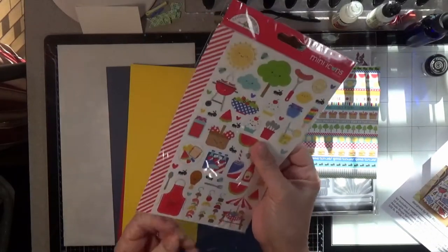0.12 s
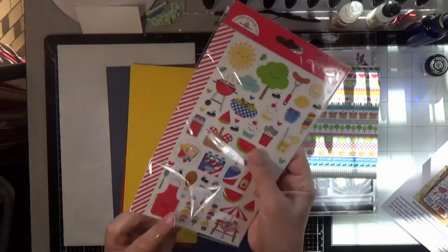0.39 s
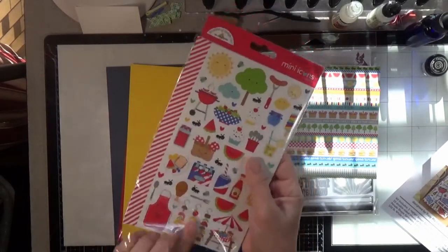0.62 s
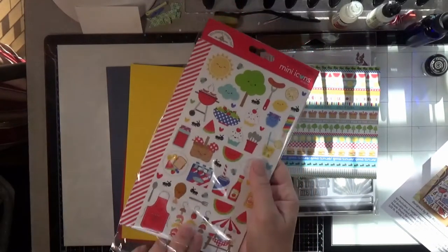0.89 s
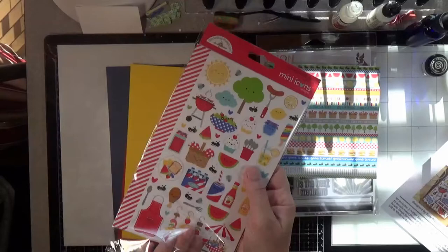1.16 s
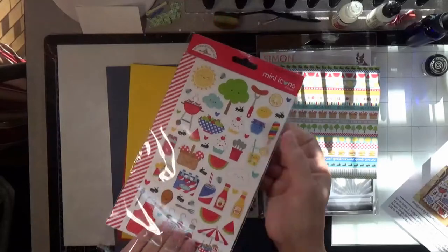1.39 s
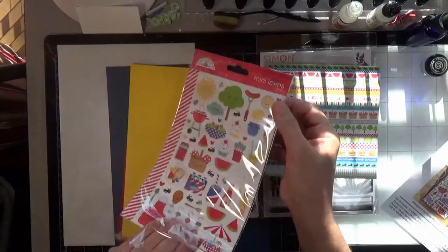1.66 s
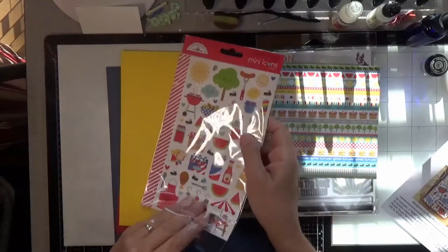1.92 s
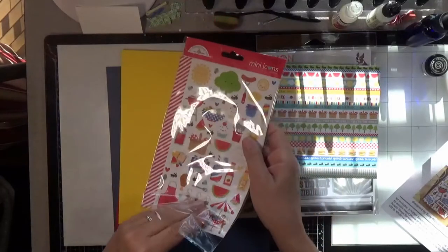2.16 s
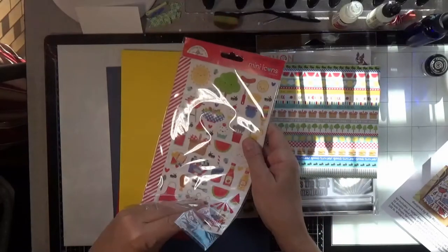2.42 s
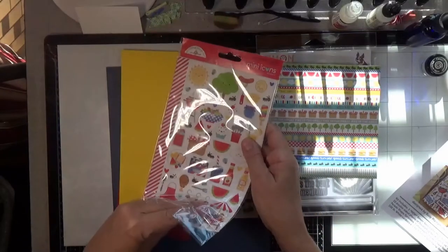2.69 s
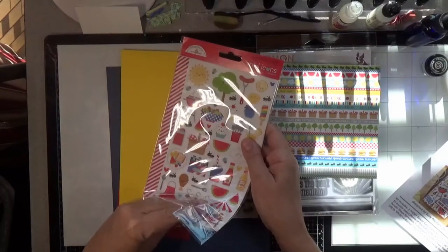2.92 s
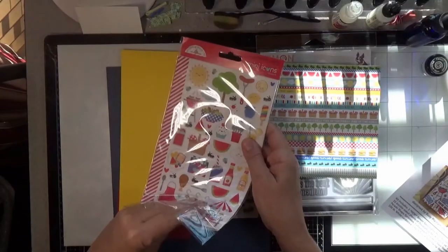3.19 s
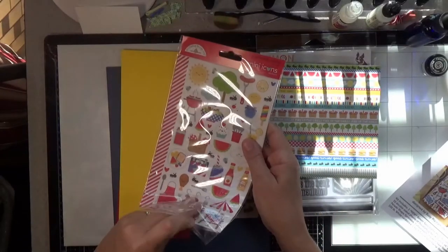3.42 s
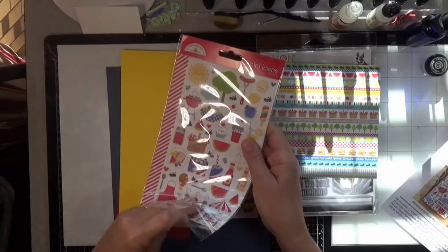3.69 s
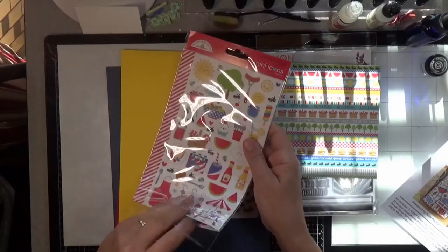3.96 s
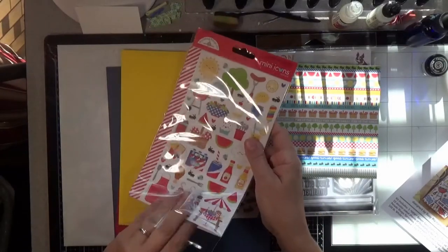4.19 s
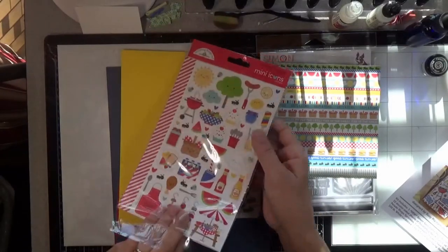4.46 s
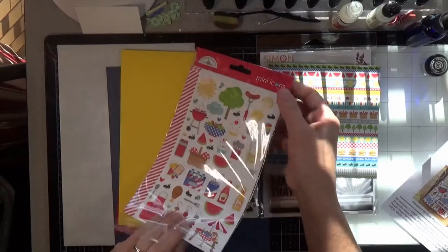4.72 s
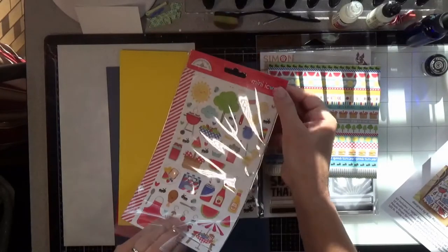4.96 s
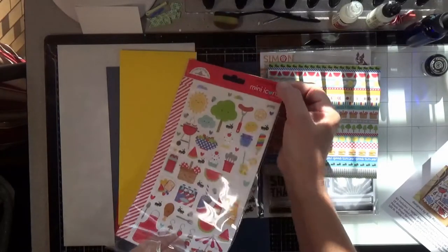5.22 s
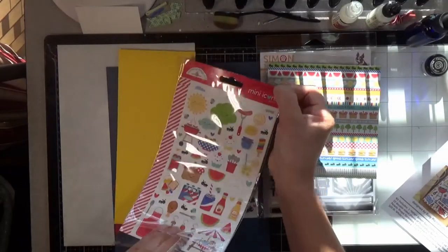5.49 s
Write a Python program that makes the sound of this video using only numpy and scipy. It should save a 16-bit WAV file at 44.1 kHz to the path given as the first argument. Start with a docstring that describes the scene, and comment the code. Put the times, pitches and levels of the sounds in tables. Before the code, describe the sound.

Hands bend a glossy film packet close by: dense sharp crackling at first, a lull midway, then scattered snaps and soft card pops.

```python
"""Creases snap as hands bend and open a thin plastic sleeve around a card of stickers, just under a camera.
A snap is a noise burst through film resonances; a pop of buckling film and card is a few cycles plus a rattle.
Countless tiny creases rustle as noise shaped by random impulses, swelling with the moves of the fingers.
The table echoes each sound within milliseconds; a small quiet room answers and hums faintly."""
import sys
import numpy as np
from scipy import signal
from scipy.fft import rfft, irfft, next_fast_len
from scipy.io import wavfile
from scipy.ndimage import uniform_filter1d, map_coordinates

SR = 44100
rng = np.random.default_rng(int(sys.argv[2]) if len(sys.argv) > 2 else 0)


def master(y):
    """Save y as 16-bit WAV."""
    cut = np.clip(np.atleast_2d(y).T, -1, 1)
    pcm = np.round(cut * 32767)  # scale
    wavfile.write(sys.argv[1], SR, pcm.astype(np.int16))


def decibels_to_gain(level_db):
    """Convert a level in decibels to a linear amplitude gain (20 dB per decade)."""
    exponent = np.asarray(level_db, float) / 20
    return 10 ** exponent


N = 247268  # length in samples
LEAD = 128  # samples of build-up before a peak

# the clearest creases snapping over: peak_s, level_db, bright_hz, dull_resonance_db, t60_s
CREASE_SNAPS = [(.007, -7, 8500, -12, .008), (0.0158, -9, 6400, 5, 0.018), (.035, -13, 9550, -21, .0022),
                (0.039, -14, 7730, -22, 0.014), (0.046, -12, 9740, 6, .023), (0.052, -7, 6600, -9, 0.0076),
                (0.058, -6, 7830, -22, 0.0023), (0.063, -9, 8830, -6, 0.011), (.081, -8, 9150, -6, 0.0091),
                (0.2863, -9, 4560, -16, 0.0041), (.2966, -5, 5840, -8, .005), (.323, -12, 8340, 4, .01),
                (0.359, -14, 7000, -13, 0.0035), (0.3643, -2.5, 8000, -5.5, 0.0082),
                (0.3802, -7.5, 10200, -29, 0.011), (.386, -15, 9830, -30, 0.0097),
                (0.397, -5, 10500, 0.5, 0.014), (0.406, -7.5, 8390, -13, 0.0043),
                (0.4173, -10.5, 8500, -32, 0.005), (0.4259, -2.5, 8700, -40, .002),
                (0.4397, -7.5, 5460, -40, 0.0023), (0.4532, -13.5, 6500, -32, 0.0054),
                (.4638, -4, 8640, -11, 0.004), (0.4729, -0.5, 8400, -20, 0.0028),
                (.4818, -12, 6050, -33, 0.015), (0.4938, -13.5, 5460, -5, 0.0044),
                (.584, -5, 7300, -18, 0.019), (.6224, -5.5, 7250, -39, 0.0029), (.634, -9, 6130, -34, .007),
                (.679, -24, 3270, -16, .004), (.714, -6.5, 7500, -10, 0.0049),
                (0.7458, -6.5, 7900, -8.5, 0.0095), (0.7523, -18, 3600, -25, .012),
                (0.896, -22, 6400, -7, .002), (1.0577, -5.5, 8250, -32, 0.0012),
                (1.0826, -6.5, 6700, -24, 0.0021), (1.212, -8, 6740, -7, .009),
                (1.2704, -16, 4700, 15, 0.0018), (1.3416, -14.5, 8100, -6, 0.0073),
                (1.4052, -35.5, 8400, -8, .0046), (1.7228, -16, 4000, -7, 0.002),
                (1.741, -17, 8350, -2, 0.0045), (1.7481, -16.5, 8060, -24, 0.0022),
                (1.772, -25, 9600, -6, .011), (1.8098, -9.5, 4980, -26, .002),
                (1.837, -13.5, 8030, -26, .0027), (1.852, -20, 7630, -22, .013),
                (1.86, -1, 8900, -28, .002), (1.8645, -10, 9920, -17, 0.016),
                (1.9115, -11, 7700, -35, 0.0031), (1.932, -8, 7240, -28, .0027),
                (1.9509, -5.5, 9400, -39, 0.0026), (2.0659, -12.5, 3930, -4, 0.0023),
                (2.1123, -17.5, 7200, -6, 0.013), (2.1266, -22, 6650, -30, .011),
                (2.7201, -21, 4120, -22, 0.0015), (3.1584, -33, 8530, -17, .002),
                (3.1907, -41, 2420, -12, .01), (3.2156, -15, 8450, -43, 0.013),
                (3.3569, -11.5, 10300, -45, 0.0057), (3.412, -27, 7540, -17, .025),
                (3.428, -19.5, 5900, 5, 0.025), (3.578, -26, 3300, -8, 0.011),
                (3.794, -27.5, 9740, -13, .008), (3.8544, -15.5, 3300, -1, .006),
                (3.9386, -19.5, 6000, 0, 0.016), (3.954, -12.5, 8000, -10, 0.0056),
                (3.9597, -14, 7100, -29, .002), (3.9916, -10, 2930, -2, 0.02),
                (4.0019, -3.5, 7900, -27, 0.0053), (4.2792, -3, 8150, -7, 0.0018),
                (4.2817, -13.5, 2800, -19.5, 0.014), (4.3005, -5.5, 6460, -12, 0.0033),
                (4.3215, -15.5, 8200, -1.5, 0.013), (4.4028, -26.5, 8400, 23, 0.0083),
                (4.4872, -12, 9050, -20, 0.0018), (4.499, -9.5, 8350, -13.5, 0.0076),
                (4.5078, -17, 8310, -30, 0.0045), (4.6444, -27.5, 6300, -3, 0.022),
                (4.7591, -14, 4730, 6, 0.0025), (4.8338, -22.5, 8100, 3, 0.0097),
                (4.8819, -12, 9200, -39, 0.003), (5.0085, -21, 3550, 1, 0.0076),
                (5.0392, -24.5, 3400, -10, .004), (5.095, -17, 3500, -16, 0.0017),
                (5.1822, -27, 3300, -9, 0.023), (5.2161, -26.5, 3100, -15, .005),
                (5.4593, -23.5, 6700, -6, 0.0029), (5.471, -31, 3280, -18, 0.011),
                (5.5258, -28, 4500, -19, 0.018), (5.553, -9.5, 9150, -44, 0.0016),
                (5.5828, -3.5, 9440, -36, 0.0016), (5.5953, -20, 9700, -18, .0022)]


def snaps():
    """Snap-through instability: a flipping crease releases a brief noise burst that excites film resonances."""
    rows = np.vstack([CREASE_SNAPS, small_snaps()])
    peak_s, level_db, hz, dull_db, t60 = rows.T[:, :, None]
    t, envelope = swell(count=1024, rise_s=0.00042 + 0.019 * t60, t60=t60)
    f = np.fft.rfftfreq(len(t), 1 / SR)
    burst = rng.standard_normal(envelope.shape) * envelope
    bright = resonance(f, hz, 0.36 * hz) ** 2
    # small tight creases crack across the whole treble, large slack ones stay dull
    treble = (hz / 8000) ** 2 * resonance(f, 1.09 * hz + 1500, 0.94 * hz)
    dull = decibels_to_gain(dull_db) * resonance(f, 4470, 5600) ** 2
    shapes = irfft(rfft(burst) * (bright + treble + dull))
    return place(shapes, peak_s[:, 0], level_db[:, 0], spread_db=1.0)


def small_snaps():
    """Random point process: lesser creases, in rows like CREASE_SNAPS, ride above the taut-film rustle."""
    count = round(60 * N / SR)  # 60 a second
    u, g = rng.random((count, 2)), rng.standard_normal((count, 3))
    peak_s = u[:, 0] * N / SR
    excess_db = 8 - 2.5 * np.log(1 - u[:, 1])  # exponential scatter
    level_db = moving(peak_s)[0] + excess_db
    hz = np.clip(5700 * np.exp(0.43 * g[:, 0]), 2500, 10500)
    dull_db = -5.5 + 8 * g[:, 1]
    t60_s = 0.0072 * np.exp(0.52 * g[:, 2])
    return np.transpose([peak_s, level_db, hz, dull_db, t60_s])


# the clearest patches buckling: peak_s, level_db, pitch_hz, t60_s
PATCH_POPS = [(0.065, -19, 2090, 0.13), (0.1008, -21, 820, 0.18), (0.2332, -29, 1160, 0.035),
              (0.2868, -16, 830, 0.01), (0.3647, -28, 490, 0.05), (0.465, -29, 510, .013),
              (0.4713, -26, 1405, 0.049), (0.7318, -22, 517, 0.016), (0.747, -25.5, 1810, 0.032),
              (0.7536, -23.5, 730, 0.011), (0.9053, -27, 685, 0.0044), (1.209, -25, 1750, 0.0092),
              (1.224, -20.5, 540, 0.033), (1.2295, -24.5, 800, .035), (1.237, -30.5, 430, 0.032),
              (1.2708, -24.5, 670, 0.013), (1.321, -29.5, 780, 0.025), (1.6017, -22.5, 780, 0.0053),
              (1.609, -31, 1110, .02), (1.6321, -22.5, 815, 0.015), (1.7222, -17, 970, 0.007),
              (1.851, -23, 1820, 0.016), (1.9438, -23.5, 860, 0.058), (2.1543, -33, 890, 0.026),
              (2.2234, -25, 1200, 0.015), (2.308, -37.5, 1260, .038), (2.547, -39, 1210, 0.044),
              (2.696, -37, 1200, .034), (2.7209, -27, 1160, 0.012), (2.753, -39.5, 1190, .015),
              (2.7936, -40.5, 1150, 0.027), (2.8331, -42, 1310, .015), (2.892, -34, 1160, .036),
              (3.2172, -36, 1130, .015), (3.301, -39.5, 1190, .01), (3.424, -22.5, 1660, 0.044),
              (3.429, -27, 856, .04), (3.7956, -15, 1410, 0.0083), (3.8557, -14.5, 1240, 0.008),
              (3.9537, -28, 1890, .017), (3.991, -28, 1740, 0.021), (4.1944, -31.5, 850, 0.025),
              (4.2835, -18.5, 1110, 0.024), (4.6085, -35, 820, .012), (4.6437, -30, 870, 0.0051),
              (4.9036, -31, 870, 0.037), (5.0068, -14, 1026, 0.0067), (5.0397, -18.5, 920, 0.0079),
              (5.095, -24, 1440, 0.0067), (5.1543, -24.5, 870, 0.0075), (5.182, -25.5, 885, 0.0052),
              (5.2152, -22.5, 1040, 0.0024), (5.4712, -37, 840, 0.011), (5.6011, -31, 1400, .01)]


def pops():
    """Buckling of a thin plate: a few clean cycles at its pitch, and film rattling on card around that pitch."""
    peak_s, level_db, hz, t60 = np.transpose(PATCH_POPS)[:, :, None]
    t, envelope = swell(count=2048, rise_s=0.00049 + 0.025 * t60, t60=t60)
    f = np.fft.rfftfreq(len(t), 1 / SR)
    noise = rng.standard_normal(envelope.shape)
    rattle = irfft(rfft(noise) * resonance(f, hz, 1.24 * hz) ** 2)
    rattle = rattle / rattle.std(axis=1, keepdims=True)
    clean = np.cos(2 * np.pi * hz * t) * np.exp(-np.abs(t) * hz / 4)  # fades by 1/e in four cycles
    ring = (clean + 0.41 * rattle) * envelope
    no_bass = (1j * f / (1j * f + 0.36 * hz)) ** 2  # a small patch radiates no bass
    return place(irfft(rfft(ring) * no_bass), peak_s[:, 0], level_db[:, 0], spread_db=1.13)


# rustle colour of taut film: hz, relative_gain_db
TAUT_COLOUR = [(800, -9), (2000, -10.5), (3200, -2.5), (5000, 1), (8500, 5), (10500, -1), (11200, 0)]
# rustle colour of slack film, which is lower: hz, relative_gain_db
SLACK_COLOUR = [(1200, -19.5), (2400, -13), (3300, 1), (4500, -4), (7000, -9.5)]
# rustle colour of the card: hz, relative_gain_db
CARD_COLOUR = [(150, -21), (330, -12), (480, -4.5), (650, -11), (830, 2), (1000, -3.5), (1300, -5.5),
               (2000, -7.5), (3500, -19.5)]


def handling():
    """Superposition of crackling noises: film and card rustle with the fingers and settle after snaps and pops."""
    coarse = np.arange(0, N / SR + .002, .002)  # levels every 2 ms
    taut_db, slack_db, card_db = [np.interp(np.arange(N) / SR, coarse, db) for db in moving(coarse)]
    taut_db = settling(taut_db, CREASE_SNAPS, below_db=-25.5, t60=0.052)
    card_db = settling(card_db, PATCH_POPS, below_db=-26, t60=0.16)
    taut = rustle(taut_db, TAUT_COLOUR, 1500, spike_db=4.0, life_s=0.0021, patchy_db=1.5, alike=0.83)
    slack = rustle(slack_db, SLACK_COLOUR, 700, spike_db=1.5, life_s=0.0013, patchy_db=3.0, alike=0.85)
    card = rustle(card_db, CARD_COLOUR, 500, spike_db=2.5, life_s=0.0023, patchy_db=2.9, alike=.92)
    return taut + slack + card


# moves of the fingers, each a swell of rustle: start_s, length_s, taut_film_db, slack_film_db, card_db
FINGER_MOVES = [(0, 0.11, -26.5, -32.5, -36), (0.088, 0.077, -27, -31, -33.5),
                (0.184, 0.15, -40.5, -44.5, -46), (0.363, .13, -31.5, -44.5, -38.5),
                (0.496, 0.21, -32.5, -47, -47), (0.726, 0.21, -35, -42.5, -42),
                (.95, 0.042, -40.5, -45, -43), (1.058, 0.065, -40, -49, -46),
                (1.193, 0.032, -39.5, -39, -42), (1.277, 0.16, -35.5, -40.5, -47),
                (1.598, 0.03, -41.5, -41, -45), (1.674, 0.096, -65, -48.5, -48.5),
                (1.841, 0.21, -35.5, -42, -45), (2.069, 0.082, -33.5, -39.5, -42.5),
                (2.197, 0.043, -40.5, -51, -50.5), (2.304, 0.016, -47, -56, -54),
                (2.427, 0.035, -59.5, -56, -58), (2.543, 0.042, -49.5, -53, -52),
                (2.708, 0.11, -78, -60.5, -56.5), (2.881, 0.039, -65, -48, -54),
                (3.04, 0.058, -57.5, -61, -74), (3.224, 0.054, -47, -52, -76),
                (3.408, 0.04, -40, -46.5, -43.5), (3.945, 0.12, -48.5, -49, -46.5),
                (4.115, 0.043, -49.5, -50.5, -53), (4.198, 0.051, -39.5, -38.5, -43),
                (4.272, 0.12, -40, -42, -48.5), (4.438, 0.1, -44.5, -51, -52),
                (4.576, 0.13, -45.5, -57.5, -58), (4.877, .06, -49, -53.5, -50.5),
                (5.022, 0.033, -38.5, -51, -48.5), (5.095, 0.012, -44.5, -49, -41),
                (5.159, 0.035, -39, -43, -45.5), (5.287, .03, -47.5, -52, -54.5), (5.4, .04, -52, -67, -58),
                (5.506, .1, -48, -69, -51.5)]
# rustle of the grip, which never rests: time_s, taut_film_db
GRIP = [(0, -38), (1.02, -63), (1.12, -48), (1.5, -48), (1.8, -53), (2.35, -66), (3.9, -60.5), (4.1, -51.5),
        (4.8, -51), (4.97, -60), (5.25, -54), (5.37, -56.5), (5.6, -67)]


def moving(t):
    """Power addition: levels in dB of taut film, slack film and card at times t, all moves over the grip."""
    start, length, *db = np.transpose(FINGER_MOVES)[:, :, None]
    into = t - start
    rise_db = 707 * np.minimum(into, 0)  # slopes in dB per second
    sag_db = 26.5 * np.maximum(into, 0)
    fall_db = 342 * np.maximum(into - length, 0)  # added as the fingers let go
    shape_db = rise_db - sag_db - fall_db
    grip_db = np.interp(t, *np.transpose(GRIP)) + [[0], [-16.5], [-6]]  # taut film, slack film, card
    return 10 * np.log10(decibels_to_gain(grip_db) ** 2 + (decibels_to_gain(db + shape_db) ** 2).sum(axis=1))


def settling(level_db, events, below_db, t60):
    """Exponential decay of power: a level in dB, raised after each event by a rustle that dies away."""
    rows = np.array(events)
    at = np.round(rows[:, 0] * SR).astype(int)
    kicks = np.bincount(at, decibels_to_gain(rows[:, 1] + below_db) ** 2, N)
    after = signal.lfilter([1], [1, -decibels_to_gain(-60 / (t60 * SR)) ** 2], kicks)
    return 10 * np.log10(decibels_to_gain(level_db) ** 2 + after)


def rustle(level_db, spectrum, per_s, spike_db, life_s, patchy_db, alike):
    """Shot noise: tiny creases of uneven size at random moments, their power falling by 1/e in life_s."""
    when = rng.random(N) < per_s / SR
    sizes = when * decibels_to_gain(spike_db * np.minimum(rng.exponential(size=N), 3.5))  # limits the largest
    decay = np.exp(-np.arange(1024) / (life_s * SR))
    flutter = np.sqrt(np.abs(signal.fftconvolve(sizes ** 2, decay)[:N]))
    noise = coloured(flutter * rng.standard_normal((2, N)), spectrum)
    # the colour drifts in patches of time and frequency as the folds move
    z = signal.stft(noise, nperseg=256)[2]
    field = uniform_filter1d(rng.standard_normal(z.shape[1:]), size=7, axis=0)
    field = uniform_filter1d(field, size=9, axis=1)
    mid, side = signal.istft(z * decibels_to_gain(patchy_db * unit(field)), nperseg=256)[1][:, :N]
    turn = np.arccos(np.clip(alike, 0, 1)) / 2  # sets the left-right correlation
    return decibels_to_gain(level_db) * unit(np.cos(turn) * mid + np.sin(turn) * side * [[1], [-1]])


# reflections off the table and things on it: delay_s, level_db
NEAR_ECHOES = [(.0029, -23), (.0052, -23)]
# decay of the room: hz, t60_s
ROOM_DECAY = [(300, 0.15), (1000, 0.055), (3000, 0.16), (8000, 0.011)]


def surroundings(x):
    """Early reflection and reverberation: weak near copies, and a short noise tail redrawn each quarter second."""
    near = x.copy()
    for delay_s, level_db in NEAR_ECHOES:
        near += decibels_to_gain(level_db) * np.pad(x, ((0, 0), (round(delay_s * SR), 0)))[:, :N]
    wet, step = np.zeros((2, N + SR)), SR // 4
    for start in range(0, N, step):
        hz, t, z = signal.stft(rng.standard_normal((2, SR // 4)), SR, nperseg=256)
        decay = decibels_to_gain(-60 * t / along(ROOM_DECAY, hz)[:, None])
        mid, side = signal.istft(z * decay, SR, nperseg=256)[1]
        tail = (0.67 * mid + 0.32 * side * [[1], [-1]]) / np.linalg.norm(mid)
        mono = x[:, start:start + step].mean(axis=0)[None]
        piece = signal.fftconvolve(mono, tail, axes=1)
        begin = start + 150  # the tail sets in 150 samples later
        wet[:, begin:begin + piece.shape[1]] += piece
    return near + decibels_to_gain(-16) * wet[:, :N]


# colour of the hum: hz, relative_gain_db
HUM_COLOUR = [(20, -42), (48, 2), (85, -7.5), (120, -2), (160, -8), (250, -3.5), (350, -10.5), (700, -13),
              (1500, -13.5), (4000, -21), (11000, -45)]
# left-right likeness of the hum: hz, correlation
HUM_LIKENESS = [(60, 1), (270, 0.9), (1200, 0.25), (6000, 0.33)]
# slow swelling and sinking of the hum: time_s, level_db
HUM_SWELL = [(0, -59), (.8, -51.5), (1.6, -55.5), (2.6, -55.5), (3.5, -57), (5.6, -57.5)]


def hum():
    """Diffuse-field coherence: the murmur of the house is nearly alike left and right in the bass."""
    m = next_fast_len(N + 8192)
    likeness = along(HUM_LIKENESS, np.fft.rfftfreq(m, 1 / SR))
    turn = np.arccos(np.clip(likeness, 0, 1)) / 2
    noise = coloured(rng.standard_normal((2, N)), HUM_COLOUR)
    mid, side = irfft(rfft(noise, m) * [np.cos(turn), np.sin(turn)], m)[:, :N]
    level_db = np.interp(np.arange(N) / SR, *np.transpose(HUM_SWELL)) + 0.65 * wobble(1.805)
    return decibels_to_gain(level_db) * unit(np.array([mid + side, mid - side]))


def swell(count, rise_s, t60):
    """Exponential growth and decay: time from the peak, and an envelope with its t60 held to 2-80 ms."""
    t = (np.arange(count) - LEAD) / SR
    return t, np.where(t < 0, np.exp(t / rise_s), decibels_to_gain(-60 * t / np.clip(t60, .002, .08)))


def resonance(f, hz, width_hz):
    """Damped oscillator: a causal band-pass response."""
    return 1j * f * width_hz / (hz * hz - f * f + 1j * f * width_hz)


def place(shapes, s, db, spread_db):
    """Level-difference stereo: shapes at their times and peak levels, each from its own random side."""
    shapes = shapes / np.abs(shapes).max(axis=1, keepdims=True)
    pan_db = spread_db * rng.standard_normal(len(s))
    first = np.round(s * SR).astype(int)[:, None] - LEAD
    at = np.maximum(first + np.arange(shapes.shape[1]), 0).ravel()
    channels = []
    for side in (1, -1):
        scaled = shapes * decibels_to_gain(db + side * pan_db)[:, None]
        channels.append(np.bincount(at, scaled.ravel(), N + SR)[:N])
    return np.array(channels)


def coloured(x, spectrum):
    """Linear filtering: x with the gains of a (hz, gain_db) spectrum."""
    m = next_fast_len(N + 8192)
    gain = decibels_to_gain(along(spectrum, np.fft.rfftfreq(m, 1 / SR)))
    return irfft(rfft(x, m) * gain, m)[..., :N]


def along(points, hz):
    """Logarithmic frequency scale: interpolates (hz, value) points."""
    f, v = np.transpose(points)
    return np.interp(np.log(hz + 1), np.log(f + 1), v)


def wobble(rate):
    """Band-limited fluctuation: a smooth random curve, rate knots a second."""
    knots = rng.standard_normal(int(N * rate / SR) + 4)
    return map_coordinates(knots, [np.arange(N) * rate / SR])


def unit(x):
    """Root-mean-square normalisation: scales x to rms 1."""
    return x / np.sqrt(np.mean(x ** 2) + 1e-20)


def scene():
    """Superposition: the sleeve in its surroundings, over the hum."""
    sleeve = snaps() + pops() + handling()
    return surroundings(sleeve) + hum()


def top_cut(x):
    """Nothing passes above the cut-off."""
    return signal.sosfilt(signal.butter(12, 12310, fs=SR, output="sos"), x)


def record(dry):
    """Low-pass filtering: the camera keeps little above eleven kilohertz."""
    # hz, gain_db
    treble_loss = [(10800, -0.5), (11200, -14.0), (11500, -38.5), (12500, -42), (16000, -65)]
    mix = coloured(dry, treble_loss)
    return top_cut(mix)


dry = scene()
out = record(dry)
master(out)
```